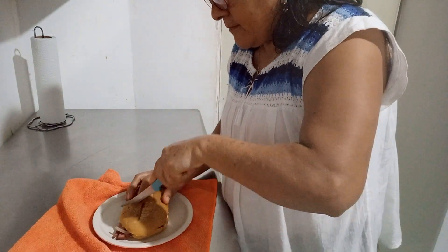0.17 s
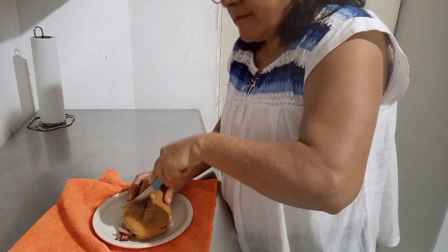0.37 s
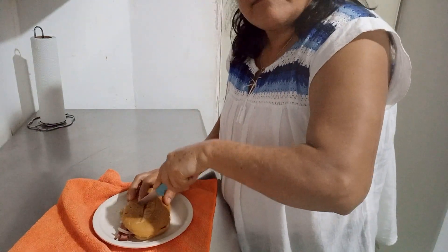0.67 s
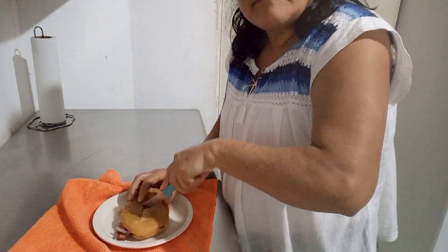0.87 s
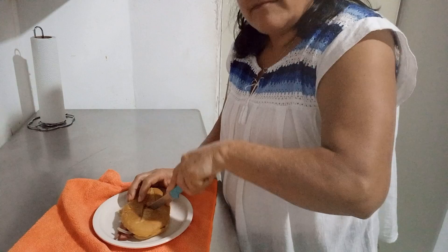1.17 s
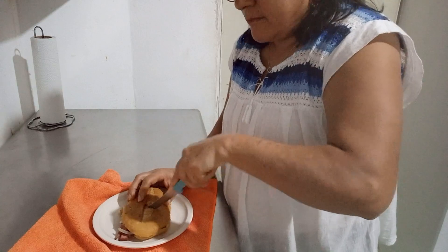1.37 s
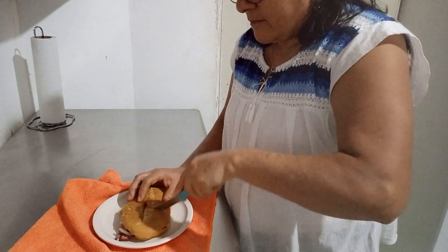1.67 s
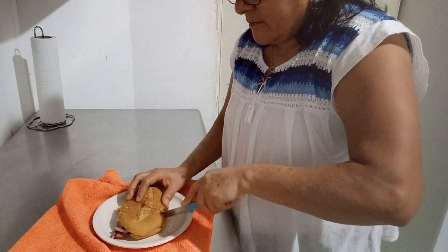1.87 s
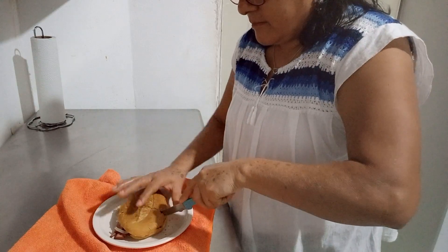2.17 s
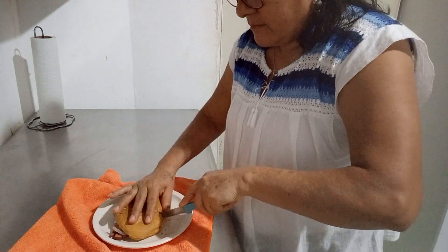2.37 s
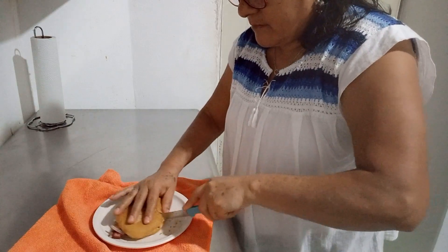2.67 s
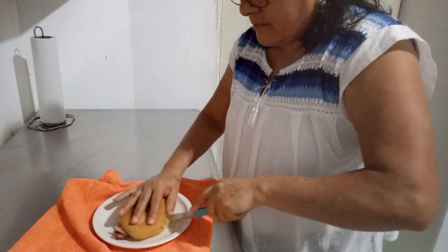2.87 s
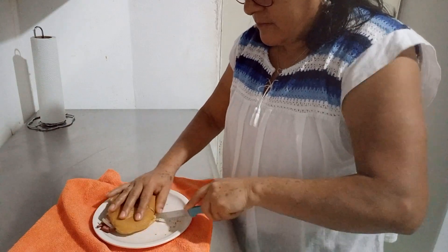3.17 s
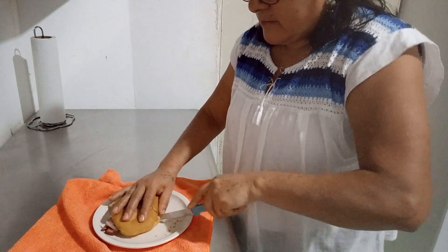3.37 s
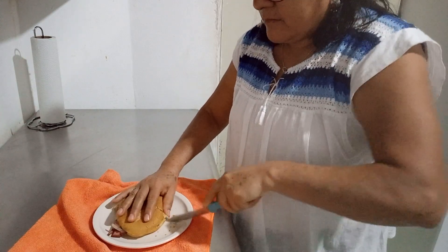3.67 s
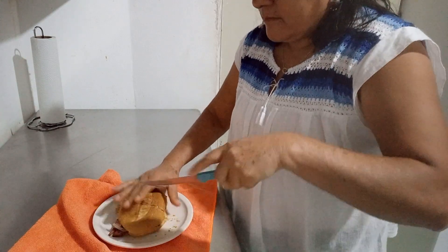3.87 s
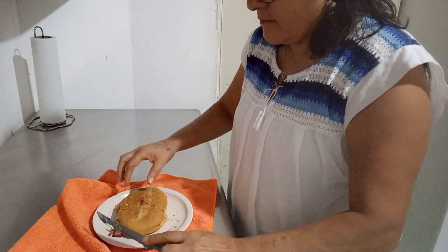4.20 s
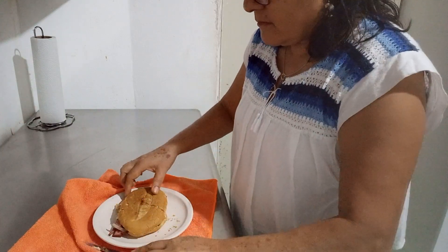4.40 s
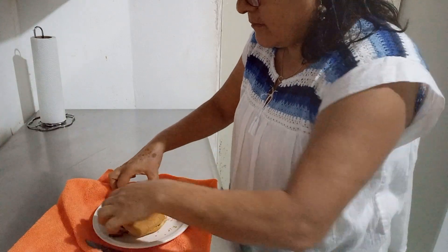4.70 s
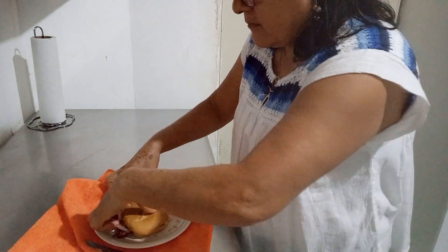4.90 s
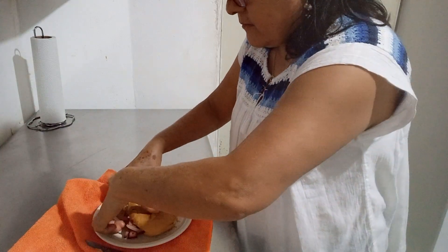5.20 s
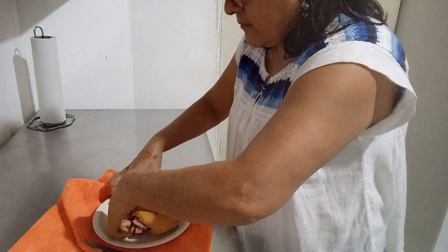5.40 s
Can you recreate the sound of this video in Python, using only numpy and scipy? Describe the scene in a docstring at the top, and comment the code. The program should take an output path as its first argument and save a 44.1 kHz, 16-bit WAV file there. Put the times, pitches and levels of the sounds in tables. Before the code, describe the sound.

A knife saws in short strokes through a crusty bread roll, crackling and crunching, with plate knocks and low table thumps in a kitchen.

```python
"""A table knife saws through a crusty roll on a plate, on a towel on a steel table in a bare kitchen.
The crust crackles and snaps: random fractures and noise bursts, coloured by filters.
Under the blade the plate rings as decaying sine modes and each push makes the table boom near 121 Hz.
A flat hand rubs the roll; at the end the knife is laid aside and fingers rustle in the roll.
Noise reverberation makes the kitchen, over steady air and microphone hiss."""
import sys
import numpy as np
from scipy import signal
from scipy.fft import rfft, irfft, next_fast_len
from scipy.io import wavfile
from scipy.ndimage import uniform_filter1d, map_coordinates

SR = 44100
rng = np.random.default_rng(int(sys.argv[2]) if len(sys.argv) > 2 else 0)


def int16_out(signal):
    """Quantize to a 16-bit WAV file."""
    q = np.round(np.clip(np.atleast_2d(signal).T, -1, 1) * 32767)
    wavfile.write(sys.argv[1], SR, q.astype(np.int16))


N = 244470
TIME = np.arange(N) / SR  # s

# Spectrum of coarse tearing bread. Each row: frequency in Hz, relative density in dB per Hz.
TEAR_COLOUR = [(250, -31), (600, -8.5), (840, -2), (990, 2.5), (1120, -0.5), (1300, 2), (1800, 1),
               (2400, 1.5), (3050, -3), (3500, -4.5), (4200, -8), (6000, -12.5), (12000, -40)]
# Spectrum of brittle crust. Each row: frequency in Hz, relative density in dB per Hz.
CRISP_COLOUR = [(500, -29.5), (1500, -7), (3000, 0.5), (3500, 4), (4200, -0.5), (5500, -1.5), (6400, -3.5),
                (7300, 2), (8200, -7), (10000, -2.5), (12500, -0.5), (15500, -5)]
# Gesture envelopes; a stroke works down through crust, crumb, plate and table in turn.
# Each holds: peak as share of the length, rise to the peak in dB, fall per length in dB.
CRUMB_STAGE = (0.46, 13, 11.67)
PLATE_STAGE = (0.87, 11.7, 14.6)
TABLE_STAGE = (0.89, 16.4, 8.4)


def amp(db):
    """Decibels to gain."""
    return 10 ** (np.asarray(db) / 20)


def unit(x):
    """Scale to rms 1."""
    return x / np.sqrt(np.mean(x ** 2) + 1e-20)


def along(points, hz):
    """Read (Hz, value) points on a log frequency axis."""
    point_hz, values = np.transpose(points)
    return np.interp(np.log(hz + 1), np.log(point_hz), values)


def wobble(rate_hz):
    """A smooth random curve, rate_hz knots a second."""
    knots = rng.standard_normal(int(N * rate_hz / SR) + 4)
    return map_coordinates(knots, [TIME * rate_hz])


def filtered(x, response):
    """x times a complex response of frequency."""
    size = 2 * next_fast_len(N // 2 + 8192)
    return irfft(rfft(x, size) * response(np.fft.rfftfreq(size, 1 / SR)), size)[..., :N]


def filtered_by(x, impulse):
    """Convolve x with one impulse response, or with one per channel."""
    size = next_fast_len(N + impulse.shape[-1], True)
    return irfft(rfft(x, size) * rfft(impulse, size), size)[..., :N]


def coloured(x, points):
    """Causal filter with the given spectrum that keeps the power of white noise."""
    size = 8192
    magnitude = unit(amp(along(points, np.fft.rfftfreq(size, 1 / SR))))
    # folding the cepstrum gives minimum phase
    cepstrum = irfft(np.log(magnitude))
    cepstrum[1:size // 2] *= 2
    cepstrum[size // 2 + 1:] = 0
    return filtered_by(x, irfft(np.exp(rfft(cepstrum))))


def fractures(rate_hz, spread_db, clump_db, clump_hz):
    """Tiny breaks of uneven size that come in clumps as the teeth catch; rms 1."""
    sizes = amp(spread_db * np.clip(rng.standard_normal(N), -2, 2)) * rng.choice([-1, 1], N)
    breaks = rng.random(N) < rate_hz / SR
    clumps = amp(clump_db * np.minimum(wobble(clump_hz), 1))
    return unit(breaks * sizes * clumps)


def swells(starts_s, lengths_s, levels_db, stage):
    """Gain of a run of gestures: each bites, builds to its peak and eases off; their powers add."""
    bite_db_per_s = 1300  # how fast any contact sets in
    peak, rise_db, fall_db = stage
    peak = max(peak, 0.01)
    power = np.zeros(N)
    for start_s, length_s, db in zip(starts_s, lengths_s, levels_db):
        progress = (TIME - start_s) / length_s
        build_db = -rise_db * np.clip(1 - progress / peak, 0, 1)
        ease_db = -fall_db * np.maximum(progress - peak, 0)
        bite_db = -bite_db_per_s * np.maximum(start_s - TIME, 0)
        power += amp(np.maximum(db + build_db + ease_db + bite_db, -160)) ** 2
    return np.sqrt(power)


def kitchen(x, direct_db, wet_db):
    """Direct sound, left first; then hard walls, alike at both microphones only in the bass."""
    # Reverberation of the walls. Each row: frequency in Hz, t60 in s.
    wall_t60 = [(100, 0.33), (300, 0.54), (2000, 0.36), (6000, 0.3), (15000, 0.21)]
    size = 32768
    hz, t, z = signal.stft(rng.standard_normal((2, size)), SR, nperseg=256)
    onset = 1 - np.exp(-t / 0.00093)
    z = z * amp(-60 * t / along(wall_t60, hz)[:, None]) * onset
    turn = np.arccos(np.sinc(hz / 1000))[:, None] / 2
    mid, side = signal.istft(z * np.array([np.cos(turn), np.sin(turn)]), SR, nperseg=256)[1]
    tail = np.array([mid + side, mid - side])
    tail = tail / np.linalg.norm(tail[0]) * amp([[0.6], [-0.6]])

    f = np.fft.rfftfreq(size, 1 / SR)
    delay_samples = np.array([[8], [14]])
    direct = np.exp(-2j * np.pi * f * delay_samples / SR)
    # small things close by scatter mostly the treble, differently to each side
    near = rng.standard_normal((2, 96)) * np.linspace(1, 0, 96)
    scattered = direct * rfft(near / np.linalg.norm(near, axis=1, keepdims=True), size)
    share = np.arctan(f / 9000)
    early = irfft(direct * np.cos(share) + scattered * np.sin(share))
    early = early * (np.arange(size) < size // 2)
    return filtered_by(x, amp(direct_db) * early * amp([[1.6], [-1.8]]) + amp(wet_db) * tail)


def background():
    """Quiet room air and microphone hiss: coloured noise, partly common to both channels."""
    # Each row: frequency in Hz, relative density in dB per Hz.
    hiss_colour = [(20, -5), (60, 12.5), (120, 25), (200, 18), (400, 20.5), (800, 9.5), (1500, 0),
                   (4000, -7.5), (6000, -5), (7100, 11), (8300, -3), (15500, -2.5)]
    noise = rng.standard_normal((2, N)) + 0.37 * rng.standard_normal(N)
    return amp(-69.0) * unit(coloured(noise, hiss_colour))


def table(push, mode_hz, wander_rad, flutter_db):
    """The lowest mode of the steel top, shaken unevenly by the hands, over a low noise thud."""
    phase = 2 * np.pi * mode_hz * TIME + wander_rad * wobble(24)
    boom = unit(np.sin(phase) * amp(flutter_db * wobble(45)))
    thud_colour = [(20, -22.0), (40, -25.5), (60, -3.5), (110, 5), (170, 6), (260, -9.5), (600, -66.5)]
    thud = coloured(rng.standard_normal(N), thud_colour)
    return push * (amp(0.5) * boom + amp(-6.0) * thud)


def sawing():
    """Gains of crackle, tearing, jolts and boom under the knife: short strokes and one long, slow cut."""
    # Pushes and pulls of the knife. Each row: start in s, length in s, then relative levels in dB of
    # crust crackle, crumb tearing, plate jolt and table boom.
    strokes = [(-0.056, 0.058, -42.5, -45, -54.5, -46), (0.153, 0.095, -43, -43.5, -46.5, -45),
               (0.244, 0.044, -52, -35, -31, -34), (0.346, 0.14, -54.5, -56.5, -55.5, -55.5),
               (0.526, 0.053, -43.5, -42, -46.5, -37.5), (0.66, 0.098, -59.5, -82, -64, -51.5),
               (0.852, 0.088, -46.5, -40.5, -45.5, -45), (0.977, 0.093, -51, -55.5, -59.5, -59),
               (1.148, 0.11, -42.5, -34.5, -47, -42.5), (1.373, .084, -53, -54, -70, -70),
               (1.461, 0.092, -40, -35, -45, -44.5), (1.65, 0.1, -54.5, -59, -60.5, -60),
               (1.796, 0.078, -48.5, -47.5, -53.5, -62), (1.821, 0.074, -45.5, -41.5, -49.5, -48.5),
               (2.878, 0.15, -47, -45.5, -55, -59.5), (3.109, 0.042, -48.5, -46, -51, -49),
               (3.223, 0.043, -55, -38.5, -41.5, -57.5), (3.35, 0.075, -43.5, -37.5, -58, -58.5),
               (3.438, 0.071, -38.5, -38, -43.5, -52), (3.56, 0.079, -42.5, -39, -43, -58),
               (3.726, 0.073, -45.5, -31.5, -35, -35)]
    # Long slow cut under the flat hand. Each row: time in s, relative pressure on the blade in dB.
    slow_cut = [(2.19, -22.5), (2.39, -14.5), (2.47, -1), (2.66, -0.5), (2.86, -5.5), (3.0, 0),
                (3.09, -14.5), (3.15, 2), (3.5, -5), (3.7, -7)]
    # Crust envelope: peak as share of the length, rise to the peak in dB, fall per length in dB.
    crust_stage = (.34, 4.8, 9.24)
    slice_crackle_db, slice_tear_db, slice_jolt_db, slice_boom_db = -51, -55.5, -65.5, -71
    start_s, length_s, crackle_db, tear_db, jolt_db, boom_db = np.transpose(strokes)
    pressure = amp(np.interp(TIME, *np.transpose(slow_cut), left=-120, right=-120))
    return (np.hypot(swells(start_s, length_s, crackle_db, crust_stage), amp(slice_crackle_db) * pressure),
            np.hypot(swells(start_s, length_s, tear_db, CRUMB_STAGE), amp(slice_tear_db) * pressure),
            np.hypot(swells(start_s, length_s, jolt_db, PLATE_STAGE), amp(slice_jolt_db) * pressure),
            np.hypot(swells(start_s, length_s, boom_db, TABLE_STAGE), amp(slice_boom_db) * pressure))


def crumbly(x, patchy_db):
    """Each bit of crust has its own size, so its own pitch: the colour shifts from clump to clump."""
    z = signal.stft(x, nperseg=256)[2]
    field = uniform_filter1d(rng.standard_normal(z.shape), size=4, axis=0)
    field = uniform_filter1d(field, size=5, axis=1)
    gain = unit(amp(patchy_db * np.minimum(unit(field), 1)))
    return signal.istft(z * gain, nperseg=256)[1][:N]


def crust(tear, crisp, hands):
    """Fine crackle of the shell over the coarser tearing of the bread."""
    # Roll cupped in the hands. Each row: frequency in Hz, relative density in dB per Hz.
    rustle_colour = [(400, -7), (1100, -17), (1340, 8.5), (1580, -10), (1890, 9), (2150, -10), (2550, 9.5),
                     (3200, -13), (4700, 1), (9000, -23)]
    shell = crisp * amp(1.22) * fractures(rate_hz=1400, spread_db=3.5, clump_db=5.5, clump_hz=260)
    breaks = fractures(rate_hz=900, spread_db=5, clump_db=4.5, clump_hz=180)
    bread = tear * amp(0.4) * crumbly(breaks, patchy_db=6.5)
    # cupped in the hands, the roll sounds hollower than under the blade
    crumb = coloured(bread * (1 - hands), TEAR_COLOUR) + coloured(bread * hands, rustle_colour)
    shell_sound = kitchen(coloured(shell, CRISP_COLOUR), direct_db=-1.5, wet_db=-1.5)
    return shell_sound + kitchen(crumb, direct_db=-5.0, wet_db=-4.5)


def thumps(knocking, hands):
    """The blade jolts the plate through the roll; bare hands only bump it softly."""
    # Plate under blade, then under hands. Each row: frequency in Hz, relative density in dB per Hz.
    blade_colour = [(60, -47), (140, -11.5), (190, 0), (225, -4.5), (262, 0.5), (320, -6), (370, -4.5),
                    (440, -6.5), (560, -4.5), (720, -11), (1000, -22.5), (2500, -59)]
    hand_colour = [(60, -41), (140, -8.5), (200, -3), (235, 2.5), (262, 6), (300, -6.5), (370, -9),
                   (480, -18), (800, -37), (2000, -60)]
    jolts = knocking * fractures(rate_hz=900, spread_db=4, clump_db=1.0, clump_hz=60)
    body = coloured(jolts * (1 - hands), blade_colour) + coloured(jolts * hands, hand_colour)
    return kitchen(body, direct_db=-2.5, wet_db=-4.5)


def snaps(t60_s):
    """Each flake breaks in a short burst of cracks: decaying noise."""
    # Flakes of crust breaking. Each row: time in s, relative energy in dB.
    flakes = [(0.154, -20.5), (0.213, -13.5), (0.24, -17), (0.2438, -5), (0.501, -15), (0.516, -17),
              (0.542, -11), (0.564, -14.5), (0.69, -34), (0.869, -7.5), (0.88, -16), (0.987, -17.5),
              (1.135, -25), (1.192, -12), (1.237, -7.5), (1.324, -18), (1.466, -20), (1.485, -13.5),
              (1.524, -12), (1.808, -18), (1.817, -16.5), (2.412, -24.5), (2.455, -21.5), (2.489, -23.5),
              (2.559, -21.5), (2.59, -23.5), (2.728, -25.5), (2.808, -21.5), (2.896, -17), (2.957, -14.5),
              (2.964, -20), (3.017, -16), (3.115, -21), (3.24, -12.5), (3.44, -6.5), (3.448, -6),
              (3.459, -4), (3.594, -6.5), (4.043, -39), (4.114, -46), (4.199, -41.5), (4.564, -48.5),
              (5.023, -31), (5.203, -26), (5.477, -35.5), (5.517, -22)]
    out, t = np.zeros(N + SR), np.arange(1024) / SR
    for start_s, db in flakes:
        burst = rng.standard_normal(len(t)) * amp(-60 * t / t60_s)
        out[round(start_s * SR):][:len(t)] += amp(db) * burst / np.linalg.norm(burst)
    return coloured(out[:N], CRISP_COLOUR) + amp(-21) * coloured(out[:N], TEAR_COLOUR)


def ringing(blows, waver):
    """Blows out of step add their power in every mode, and each mode dies at its own speed."""
    # Plate and table under the blade. Each row: frequency in Hz, relative level in dB, t60 in s.
    modes = [(262.4, -4.5, 0.27), (295.4, 1.5, 0.3), (324.7, -21, 0.44), (460, -3, 0.21), (535, -13, 0.12),
             (721, -13, 0.57), (1330, -8, 0.4), (1900, -8, .2), (2003, -17, .22), (2040, -8.5, .22),
             (2230, -19, 0.14), (2700, -18.5, 0.39), (3450, -10, .12), (5303, -15.5, 0.35),
             (6380, -15.5, 0.27), (7730, -13, .25)]
    out = np.zeros(N)
    for hz, db, t60_s in modes:
        power = signal.lfilter([1], [1, -amp(-120 / t60_s / SR)], blows ** 2)
        drift_rad = waver * np.cumsum(rng.standard_normal(N)) / np.sqrt(SR)
        out += amp(db) * np.sqrt(power) * np.sin(2 * np.pi * hz * TIME + drift_rad)
    return out


def blade(slip_hz, scatter):
    """Knocks and a quick stick-slip judder ring the plate."""
    # Blade breaks through onto the plate. Each row: time in s, relative level in dB.
    hits = [(0.2443, -7), (0.2449, -4), (.256, -27.5), (0.262, -18.5), (.272, -46.5)]
    # Blade dragged out over the plate. Each row: time in s, relative slip strength in dB.
    drag_out = [(3.722, -7), (3.737, -6.5), (3.76, -2.5), (3.78, -30.5), (3.82, -28.5), (3.84, -36)]
    knocks, judder = np.zeros((2, N))
    for start_s, db in hits:
        knocks[round(start_s * SR)] += amp(db)
    # the blade sticks and slips at a nearly steady rate
    drag_s, drag_db = np.transpose(drag_out)
    periods = 1 + scatter * rng.standard_normal(24)
    slips_s = drag_s[0] + np.cumsum(np.r_[0, periods]) / slip_hz
    judder[np.round(slips_s * SR).astype(int)] = amp(np.interp(slips_s, drag_s, drag_db, right=-120))
    ring = amp(-29.5) * ringing(amp(-4.5) * knocks + judder, waver=3)
    # a knock is one clean crack, a slip a gritty scrape of a millisecond or so
    grit = amp(-60 * TIME[:SR // 100] / 0.0035)
    scrape = signal.lfilter(grit / np.linalg.norm(grit), 1, judder) * rng.standard_normal(N)
    # Each row: frequency in Hz, relative density in dB per Hz.
    scrape_colour = [(120, -45), (400, -4), (700, -1.5), (930, -9.5), (1500, -5.5), (2100, 7.5), (3000, -7),
                     (3450, 2.5), (4100, -4.5), (5500, -2.5), (7500, -16.5), (10000, -14)]
    contact = amp(3.0) * coloured(knocks, TEAR_COLOUR) + amp(1.5) * coloured(scrape, scrape_colour)
    return kitchen(ring, direct_db=-5.5, wet_db=-2.5) + kitchen(contact, direct_db=-6.0, wet_db=-2.0)


def palm():
    """Skin drags softly over the top of the roll: clumped tiny breaks, low coloured."""
    # Flat hand slides onto the roll and presses it. Each row: start in s, length in s, relative rub in dB.
    rubs = [(2.19, 0.11, -68), (2.47, .19, -56)]
    # Each row: frequency in Hz, relative density in dB per Hz.
    rub_colour = [(200, -30.5), (330, 0.5), (420, 8.5), (600, -0.5), (850, -13.5), (1400, -22), (3000, -41)]
    friction = fractures(rate_hz=1200, spread_db=1, clump_db=7, clump_hz=32)
    drag = swells(*np.transpose(rubs), CRUMB_STAGE) * friction
    return kitchen(coloured(drag, rub_colour), direct_db=-4.5, wet_db=-8.0)


def handling():
    """The same four gains under bare hands: squeezes rustle the roll, bumps shake plate and table."""
    # Fingers squeeze the roll. Each row: start in s, length in s, relative rustle in dB.
    squeezes = [(4.826, 0.15, -66.5), (4.997, 0.15, -63), (5.178, 0.12, -59.5), (5.329, 0.054, -56.5),
                (5.5, .1, -48)]
    # Hands and knife handle bump the covered table and the plate. Each row: start in s, length in s,
    # relative plate jolt in dB, relative table boom in dB.
    bumps = [(4.375, 0.034, -60.5, -45), (4.473, 0.04, -46, -35.5), (4.533, 0.016, -45, -40),
             (4.61, .025, -71, -48.5), (4.861, 0.071, -54.5, -49), (5.222, 0.093, -52.5, -58.5),
             (5.482, 0.057, -76, -68)]
    crackle_over_rustle_db = -2
    rustle = swells(*np.transpose(squeezes), CRUMB_STAGE)
    start_s, length_s, jolt_db, boom_db = np.transpose(bumps)
    jolt = swells(start_s, length_s, jolt_db, PLATE_STAGE)
    boom = swells(start_s, length_s, boom_db, TABLE_STAGE)
    return amp(crackle_over_rustle_db) * rustle, rustle, jolt, boom


def scene():
    """Crust, blade and table in the kitchen."""
    crisp, tear, knocking, push = np.hypot(sawing(), handling())
    # the knife is laid aside and the hands take over
    hands = np.interp(TIME, [4.2, 4.35], [0, 1])
    flakes = kitchen(snaps(t60_s=0.016), direct_db=1.9, wet_db=-0.5)
    roll = crust(tear, crisp, hands) + palm() + flakes
    plate = thumps(knocking, hands) + blade(slip_hz=138.6, scatter=0.068)
    # the table never quite stops trembling under the hands
    rest_boom_db = -73.5
    push = np.hypot(push, amp(rest_boom_db))
    boom = table(push, mode_hz=121.3, wander_rad=0.55, flutter_db=3.5) * amp([[1.2], [-1.4]])
    return roll + plate + boom + background()


def record(dry):
    """Steep low-pass at the band limit."""
    top_hz = 15950
    return filtered(dry, lambda hz: 1 / np.sqrt(1 + (hz / top_hz) ** 160))


dry = scene()
out = record(dry)
int16_out(out)
```